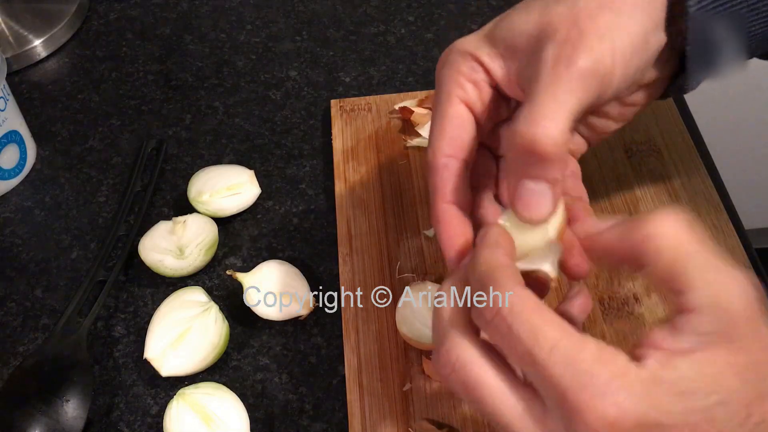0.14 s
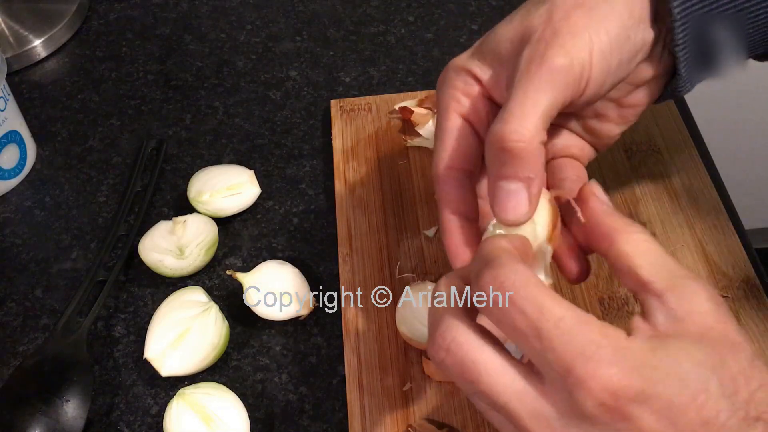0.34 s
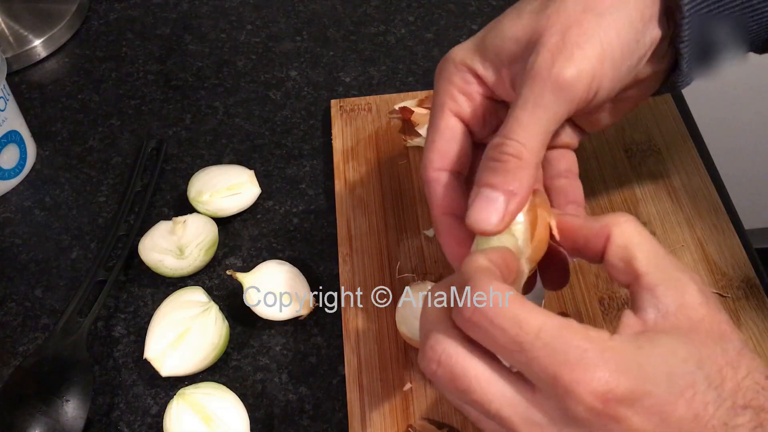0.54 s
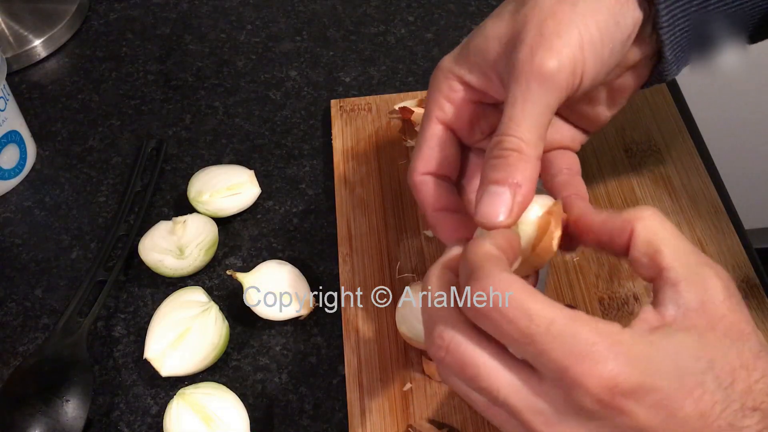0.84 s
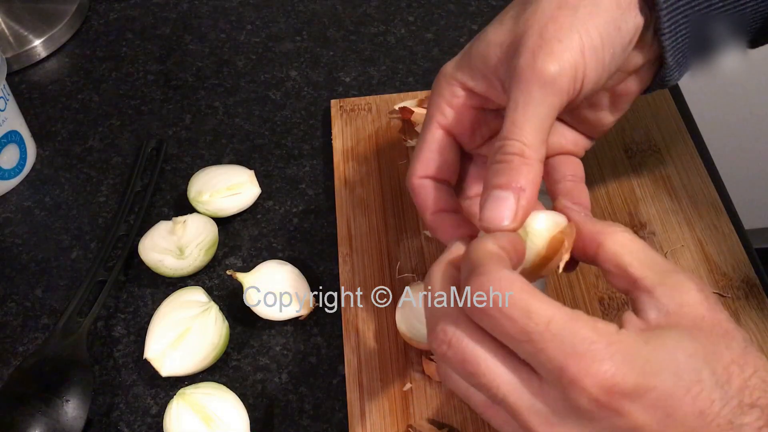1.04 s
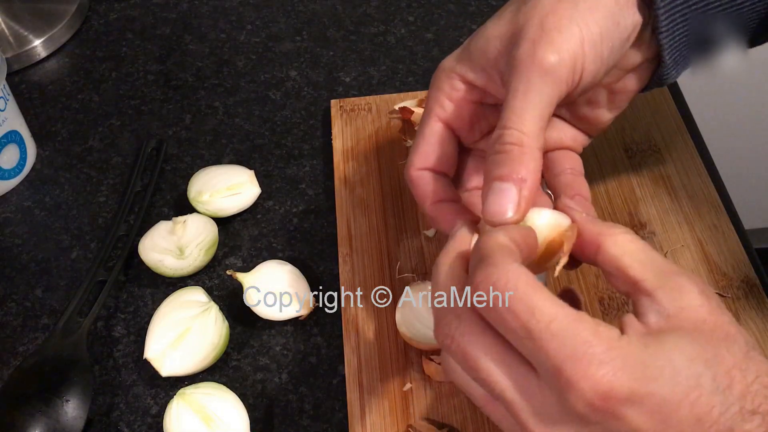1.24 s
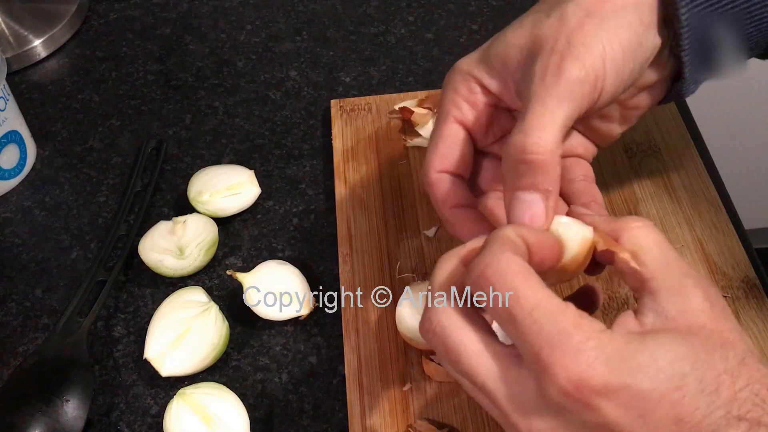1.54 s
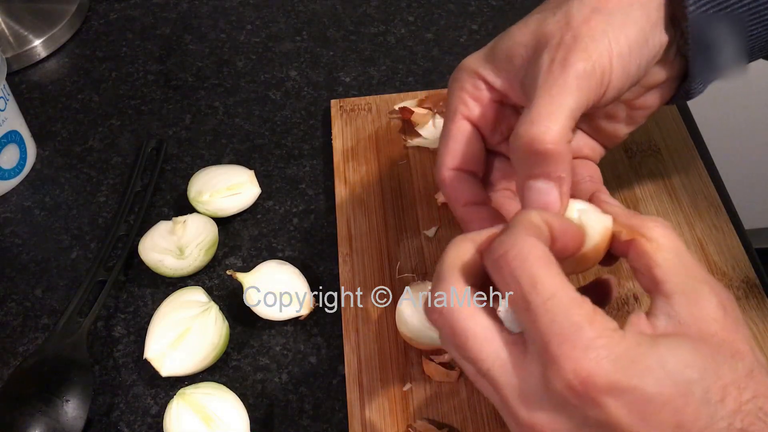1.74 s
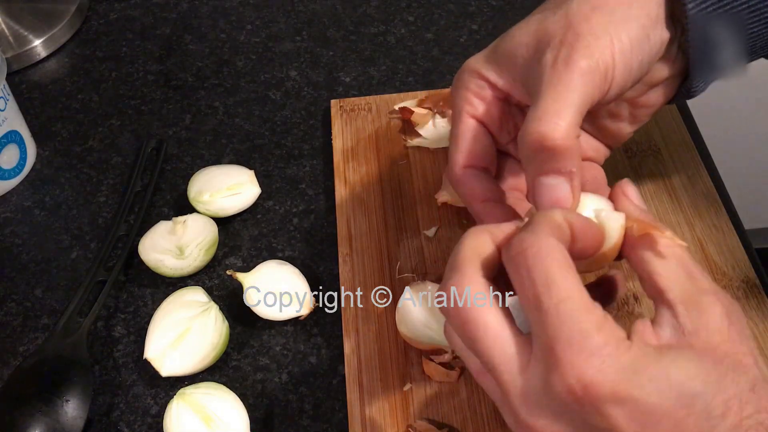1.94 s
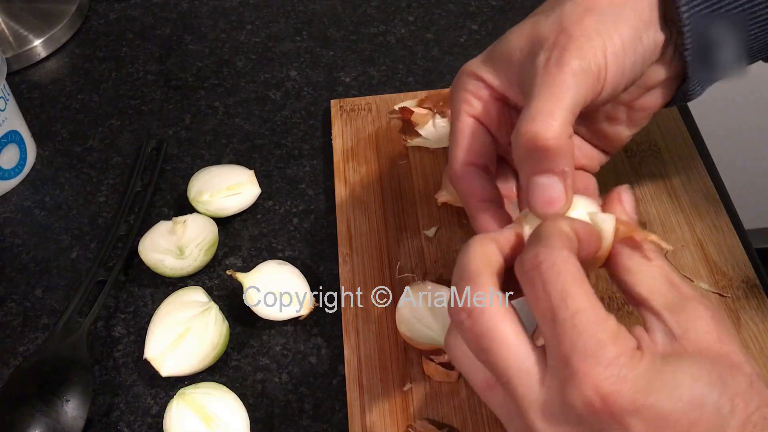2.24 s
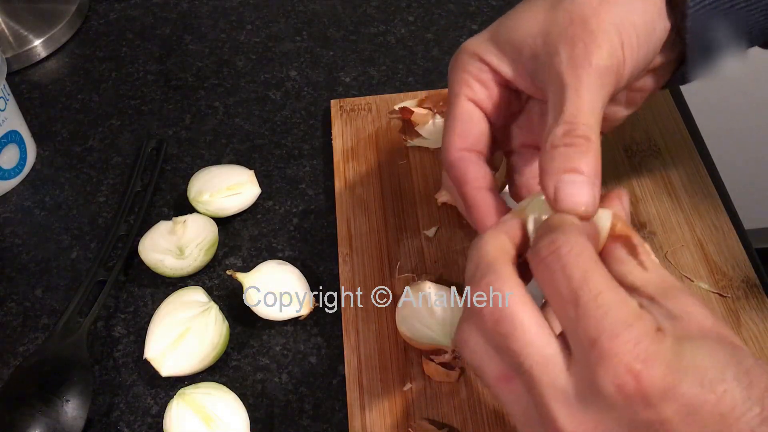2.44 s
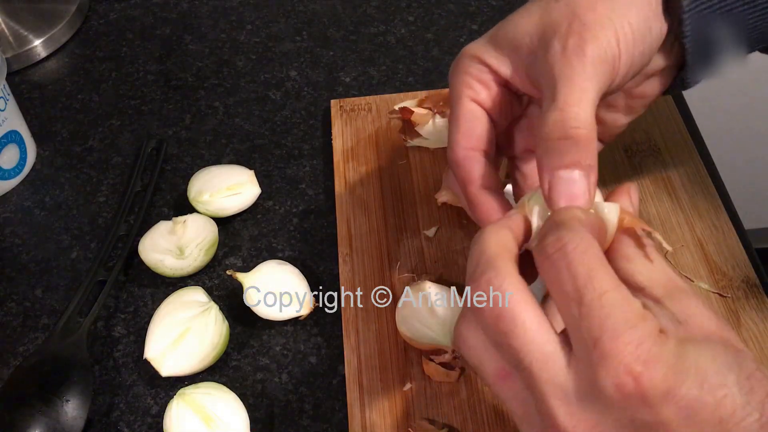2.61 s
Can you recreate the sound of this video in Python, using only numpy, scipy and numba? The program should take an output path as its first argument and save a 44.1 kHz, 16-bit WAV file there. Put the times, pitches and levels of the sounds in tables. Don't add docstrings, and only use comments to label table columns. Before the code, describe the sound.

Fingers peel dry skin off a small onion very close to the microphone: a dense burst of sharp crackles, a quieter pause with faint ticks, then more tearing snaps, over soft fridge hum in a small kitchen.

```python
import sys
import numpy as np
from scipy import signal
from scipy.fft import rfft, irfft
from scipy.io import wavfile
from scipy.ndimage import uniform_filter1d, minimum_filter1d
from numba import njit

SR = 44100
rng = np.random.default_rng(int(sys.argv[2]) if len(sys.argv) > 2 else 0)


def voltage_ratio(decibels):
    exponent = np.asarray(decibels, float) / 20
    return 10 ** exponent


def put_to_file(sound):
    columns = np.atleast_2d(sound).T
    safe = np.clip(columns, -1, 1)
    whole_steps = np.round(safe * 32767)
    wavfile.write(sys.argv[1], SR, whole_steps.astype(np.int16))


N = 122157

# t/s, peak level/dB, ring f/Hz, brightness/dB
FIRST_TEAR = [(0.0144, -2, 5300, 9), (0.0273, 2.5, 5030, 8.5), (0.035, 1, 5700, 14),
              (0.0783, -1.5, 5170, 1.5), (0.0889, -2.5, 5000, -10), (0.096, 0.5, 5510, -7),
              (0.11, -8.5, 4360, -4), (0.1155, -3.5, 5340, 4), (0.1225, -9.5, 4650, 4.5),
              (0.1343, -13, 6240, 8), (0.1487, -6, 4660, -2), (0.165, -16, 5430, -9),
              (0.1828, -6, 4830, 11), (0.185, 3, 5060, -1.5), (0.2251, -5.5, 3100, -7),
              (0.2402, 3, 6900, 9), (0.247, -7, 6100, -7), (0.2532, 1.5, 6850, -2), (0.317, 2, 5030, 9),
              (0.3197, 0.5, 8800, -12), (0.32, 1.5, 5150, -5), (0.3517, -2, 5430, 3.5),
              (0.3989, -2, 5170, 8.5), (0.4394, -2.5, 5870, 14.5), (0.445, -6, 7140, 5),
              (0.484, -17.5, 6440, 3), (0.5674, -6, 6160, 8)]
PICKING = [(0.5754, -9, 5830, 1), (0.6058, -4, 2330, -5), (0.7841, -22, 7000, 1), (0.8704, -17.5, 5240, 0),
           (1.2381, -19, 7500, -10), (1.2459, -16.5, 6450, 14.5), (1.2722, -21, 7500, 20),
           (1.315, -13, 8000, -11), (1.3984, -18, 7700, 5), (1.4416, -26, 7000, 19),
           (1.4752, -15, 4350, 6.5), (1.4824, -14, 4780, 8), (1.4941, -18, 4000, 8),
           (1.5258, -17, 6720, 10), (1.5425, -11, 3380, 9), (1.548, -11, 4900, -5), (1.5567, 0.5, 5700, -6),
           (1.5676, 4, 4850, -8), (1.578, 1, 4760, -5), (1.5875, -2.5, 4830, -11),
           (1.6006, -2.5, 4690, -10), (1.6068, 0, 4800, -4)]
SECOND_TEAR = [(1.611, 2.5, 3330, -5), (1.634, -3, 4610, -3), (1.6568, 1, 3170, -14.5),
               (1.704, -8.5, 6040, 11), (1.7484, -18.5, 2630, -18), (1.786, -5, 4700, 0.5),
               (1.8019, -7.5, 6000, 3), (1.8229, -9, 5900, -13), (1.8369, 0.5, 3410, -7.5),
               (1.8936, -11, 7000, -3), (1.9117, -4, 3480, -0.5), (1.9204, -13.5, 2630, 5),
               (1.939, -7.5, 3380, -0.5), (1.972, -6.5, 4470, 1.5), (2.0248, 2.5, 3060, -21),
               (2.0403, -14, 2450, -4), (2.0474, -2.5, 6400, 2), (2.054, -9, 6240, -5),
               (2.0644, 2, 3550, -2.5), (2.164, -13, 2500, 15)]
LAST_TEAR = [(2.178, -2.5, 6500, -10), (2.2316, -18, 3320, 8), (2.3005, -18, 7040, 8),
             (2.3174, -10, 6300, -10), (2.3349, -3, 6600, 5), (2.3389, -10, 3200, -11),
             (2.3489, -10, 7800, -2), (2.4005, -7, 5850, 4), (2.4041, -13.5, 1920, -4),
             (2.4371, -10, 7900, -12), (2.4518, -10, 1740, 2), (2.5197, -10.5, 2240, -11.5),
             (2.5554, -12, 5990, 9), (2.5636, -4.5, 2380, -30), (2.585, -0.5, 9100, 0.5),
             (2.6377, -16, 7920, 0), (2.6406, 3, 2970, -7.5), (2.692, 0.5, 7300, 12),
             (2.7083, 0.5, 2160, 6), (2.745, -2.5, 3180, -1), (2.754, -9.5, 3250, 5)]
# t/s, peak level/dB, ring f/Hz, brightness/dB
MORE_CRACKS = [(0.326, -10, 5500, 0), (0.3922, -15, 4800, 0), (0.4008, -10, 1090, 2), (0.403, -14, 4500, 0),
               (1.0412, -35, 8000, 6), (1.0676, -29, 6000, 6), (1.127, -29.5, 5130, -3),
               (1.1375, -33, 7000, 4), (1.1755, -35, 8000, 10), (1.185, -33, 8000, 8),
               (1.2178, -23, 8000, 0), (1.235, -21, 8000, 0), (1.255, -24.5, 9000, 7),
               (1.2856, -12.5, 6140, 8), (1.2876, -12, 6230, 1), (1.2894, -12.5, 2480, 11),
               (1.2945, -19, 6000, 2), (1.311, -24, 3000, -2), (1.5547, -9, 2480, -7),
               (1.5585, -6, 4500, -9), (1.561, -4, 6500, -4), (1.5713, 0, 5000, -3), (1.6142, -9, 1860, -4),
               (1.675, -22, 8000, 6), (1.772, -22, 4300, 0), (2.0005, -18, 7170, 4), (2.0253, -6, 1650, -14),
               (2.173, -12, 3000, 5), (2.279, -26, 7000, 6), (2.41, -13.5, 1500, -1.5),
               (2.484, -20, 8880, 4), (2.513, -25, 9000, 7), (2.531, -21, 8000, 5), (2.5653, -10, 1100, -15),
               (2.5859, -6.5, 1300, -10), (2.601, -21, 7500, 3), (2.6928, -7, 1800, -6)]
# t/s, level/dB
RUB = [(0, -29.5), (.3, -41), (.5, -41.5), (.84, -43), (.86, -57), (1.0, -53.5), (1.2, -52), (1.29, -49),
       (1.36, -52.5), (1.46, -50), (1.5, -41), (1.7, -42), (2.01, -40.5), (2.1, -38), (2.25, -41.5),
       (2.5, -39.5), (2.685, -45), (2.77, -26.5)]
# f/Hz, density/dB
RUB_SPECTRUM = [(800, -13), (1500, -0.5), (2200, 0.5), (6000, -3), (12500, -3.5), (16500, -6.5)]
# t/s, fade/s, f/Hz, level/dB
SCRAPES = [(0.316, 0.018, 8640, -14), (1.283, 0.0066, 6150, -20), (1.311, 0.014, 6300, -30.5),
           (1.47, 0.054, 6100, -38.5), (1.556, 0.089, 5430, -23.5), (1.91, 0.026, 103, -31),
           (2.065, 0.054, 3360, -24.5), (0.322, 0.043, 5400, -26.5), (0.322, .06, 2120, -30.5),
           (2.645, 0.025, 6440, -26), (2.71, 0.064, 2500, -28.5), (1.6, 0.058, 1630, -26)]
# f/Hz, level/dB rms
HUM = [(100, -38.5), (171, -42), (200, -34), (301, -51.5), (400, -54)]
# f/Hz, density/dB
AIR_SPECTRUM = [(28, -28), (52, 3.5), (78, -12.5), (150, -3.5), (260, -11), (950, -22.5), (2500, -36.5),
                (4800, -44), (16500, -52)]

SNAP_S, SPLIT_S, SPLIT_DB, SPLIT_GRAIN = 0.00074, 0.004, -12.5, 0.7
FIRST_BREAK = 2.71
RING_Q, BODY_HZ, BODY_DB, BRIGHT_HZ = 8.3, 3620, -6.5, 10790
THUD_HZ, THUD_DB, THUD_DB_PER_OCTAVE = 1580, -20, 7
LOUD_FROM_DB, LOUD_GAIN = -3, 1.56
TICKS_PER_S, TICK_DB, TICK_SPREAD_DB = 180, 5.5, 4.5
RUB_FLUTTER_DB, GRIT_DB = 1.2, 3
BOARD_T60_S, BOARD_DB = 0.12, -12.5
ROOM_T60_S, ROOM_DB, ROOM_HZ = 0.56, -24, 3060
AIR_DB, MOTOR_HZ, MOTOR_WIDTH_HZ, MOTOR_DB = -35, 116, 53, -35
CEILING_DB, RELEASE_S, START_DB = -0.26, 0.07, 9.5
NOTCH_HZ, NOTCH_Q, NOTCH_SHARE = 10400, 10, 0.5
TOP_HZ, CLICK_TOP_HZ, CLICK_RISE = 15850, 16750, 9.0


def resonance(f_hz, centre_hz, q):
    r = f_hz / centre_hz
    return 1j * r / q / (1 - r ** 2 + 1j * r / q)


def level(x, db):
    return x * voltage_ratio(db) / np.sqrt(np.mean(x ** 2))


def filtered_noise(response):
    return irfft(rfft(rng.standard_normal(N)) * response, N)


def coloured(spectrum):
    s = np.array(spectrum, float)
    f_hz = np.arange(N // 2 + 1) * SR / N + 1
    db = np.interp(np.log(f_hz), np.log(s[:, 0]), s[:, 1], left=-60)
    return filtered_noise(voltage_ratio(db))


def walk(rate_hz):
    k = int(SR / rate_hz)
    steps = np.repeat(rng.standard_normal(N // k + 1), k)
    return 2.16 * uniform_filter1d(uniform_filter1d(steps, k), k)[:N]


def snaps(rows, size=1024):
    t, f_hz = np.arange(size) / SR, np.arange(size // 2 + 1) * SR / size
    start_s, peak_db, ring_hz, bright_db = (rows[:, i:i + 1] for i in range(4))
    chance = rng.standard_normal((len(rows), 3, size))
    chance[:, :2, 9] += FIRST_BREAK * np.sign(chance[:, :2, 9])

    grain = np.exp(SPLIT_GRAIN * 3.91 * uniform_filter1d(chance[:, 2], size=12) - SPLIT_GRAIN ** 2)
    snap_s = SNAP_S * voltage_ratio(np.clip(peak_db, -16, 0) / 2)
    split = voltage_ratio(SPLIT_DB) * np.exp(-t / SPLIT_S) * np.minimum(grain, 2)
    burst = (np.exp(-t / snap_s) + split) * np.clip(t / 0.00027, 0, 1)

    flake = resonance(f_hz, ring_hz, RING_Q)
    body = voltage_ratio(BODY_DB) * resonance(f_hz, np.sqrt(BODY_HZ * ring_hz), 0.58) ** 2
    thud_db = THUD_DB + THUD_DB_PER_OCTAVE * np.log2(5000 / ring_hz)
    thud = voltage_ratio(thud_db) * resonance(f_hz, THUD_HZ, 0.79) ** 2
    edge = voltage_ratio(bright_db - 4.5) * resonance(f_hz, BRIGHT_HZ, 1.72) ** 2

    low = rfft(burst * chance[:, 0]) * (flake + body + thud)
    high = rfft(burst * chance[:, 1]) * edge
    wave = irfft(low + high, size)
    wave *= voltage_ratio(peak_db) / np.abs(wave).max(axis=1, keepdims=True)
    out = np.zeros(N + size)
    np.add.at(out, (start_s * SR).astype(int) + np.arange(size), wave)
    return out[:N]


def cracks():
    rows = np.concatenate([np.array(r, float) for r in (FIRST_TEAR, PICKING, SECOND_TEAR, LAST_TEAR, MORE_CRACKS)])
    rows[:, 1] += LOUD_GAIN * np.clip(rows[:, 1] - LOUD_FROM_DB, 0, 8)
    return snaps(rows)


def rubbing():
    rub_s, rub_db = np.array(RUB, float).T
    u = rng.random((int(TICKS_PER_S * N / SR), 4))
    tick_s = u[:, 0] * N / SR
    tick_db = np.interp(tick_s, rub_s, rub_db) + TICK_DB - TICK_SPREAD_DB * np.log(u[:, 1] + 0.14)
    ticks = np.stack([tick_s, tick_db, 2500 + 5000 * u[:, 2], 12 * u[:, 3] - 6], axis=1)
    hiss_db = np.interp(np.arange(N) / SR, rub_s, rub_db) + RUB_FLUTTER_DB * walk(39.8)
    return snaps(ticks) + level(coloured(RUB_SPECTRUM), 0) * voltage_ratio(hiss_db)


def scrapes():
    t, f_hz = np.arange(N) / SR, np.arange(N // 2 + 1) * SR / N
    out = np.zeros(N)
    for start_s, fade_s, hz, db in SCRAPES:
        noise = filtered_noise(resonance(f_hz, hz, 4.8) ** 2 + 0.33 * resonance(f_hz, hz, 0.29) ** 2)
        grit = voltage_ratio(GRIT_DB * np.clip(walk(300), -3, 1.5))
        after_s = t - start_s
        fade = np.clip(after_s / 0.0023, 0, 1) * np.exp(-np.abs(after_s) / fade_s)
        out += level(noise * grit, db) * fade
    return out


def echoes(x):
    size = 30000
    t, f_hz = np.arange(size) / SR, np.arange(size // 2 + 1) * SR / size

    def decay(t60_s):
        return rng.standard_normal(size) * voltage_ratio(-60 * t / t60_s) * np.clip(t / 0.0036, 0, 1)

    def unit_energy(h):
        return h / np.sqrt(np.sum(h ** 2))

    board = decay(BOARD_T60_S)
    room = irfft(rfft(decay(ROOM_T60_S)) * (0.38 + resonance(f_hz, ROOM_HZ, 0.47)))
    response = voltage_ratio(BOARD_DB) * unit_energy(board) + voltage_ratio(ROOM_DB) * unit_energy(room)
    return signal.fftconvolve(x, response)[:N]


def fridge():
    t, f_hz = np.arange(N) / SR, np.arange(N // 2 + 1) * SR / N
    lines = np.zeros(N)
    for hz, db in HUM:
        cycles = hz * t + 0.044 * walk(5.39) + rng.random()
        lines += np.sqrt(2) * voltage_ratio(db + 1.17 * walk(5.88)) * np.sin(2 * np.pi * cycles)
    motor = filtered_noise(resonance(f_hz, MOTOR_HZ, MOTOR_HZ / MOTOR_WIDTH_HZ) ** 2)
    return lines + level(motor * voltage_ratio(1.5 * walk(5.0)), MOTOR_DB)


def kitchen_air():
    return level(coloured(AIR_SPECTRUM), AIR_DB)


def scene():
    near = cracks() + rubbing() + scrapes()
    return (near + echoes(near) + fridge() + kitchen_air())[None]


@njit
def limit(x, ceiling, release, envelope):
    gain = np.empty(len(x))
    for i in range(len(x)):
        envelope = max(x[i], envelope * release)
        gain[i] = min(1., ceiling / (envelope + 1e-9))
    return gain


def limiter(x):
    release = float(np.exp(-1 / (RELEASE_S * SR)))
    gain = limit(np.abs(x[0]), float(voltage_ratio(CEILING_DB)), release, float(voltage_ratio(START_DB)))
    return x * uniform_filter1d(minimum_filter1d(gain, size=65), size=33)


def low_pass(x, hz):
    return signal.sosfiltfilt(signal.ellip(12, 0.1, 60, hz, fs=SR, output="sos"), x)


def click_top(x):
    low = low_pass(x, TOP_HZ)
    top = low_pass(x, CLICK_TOP_HZ) - low
    calm = uniform_filter1d(top ** 2, size=64) < CLICK_RISE * uniform_filter1d(top ** 2, size=2048)
    gate = uniform_filter1d(1 - minimum_filter1d(calm * 1., size=400), size=256)
    return low + gate * top


def top_cut(x):
    return signal.sosfilt(signal.butter(12, 16830, fs=SR, output="sos"), x)


def record(dry):
    notched = signal.lfilter(*signal.iirnotch(NOTCH_HZ, NOTCH_Q, fs=SR), dry)
    x = notched * NOTCH_SHARE + dry * (1 - NOTCH_SHARE)
    mix = click_top(limiter(x))
    return top_cut(mix)


dry = scene()
out = record(dry)
put_to_file(out)
```